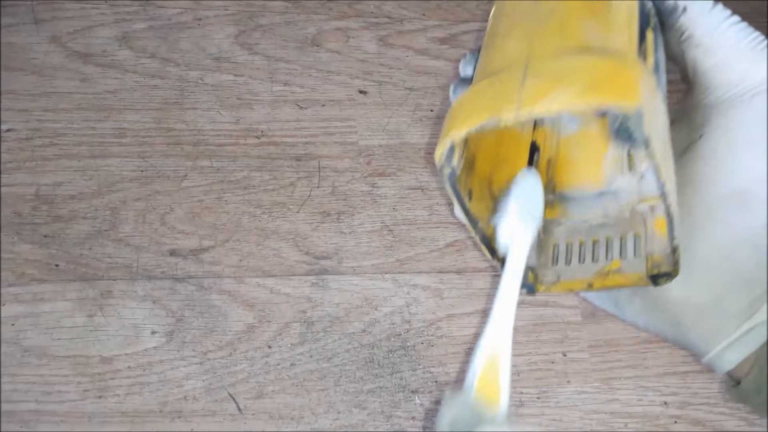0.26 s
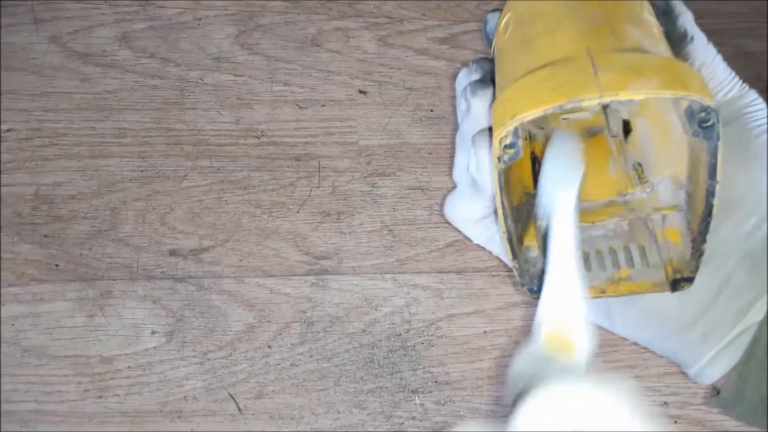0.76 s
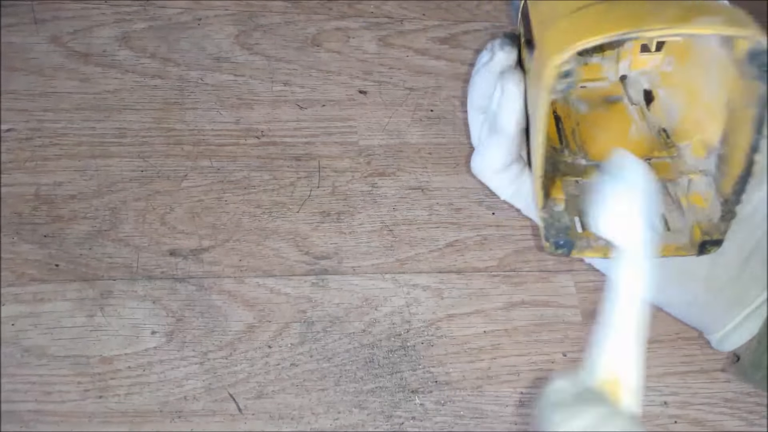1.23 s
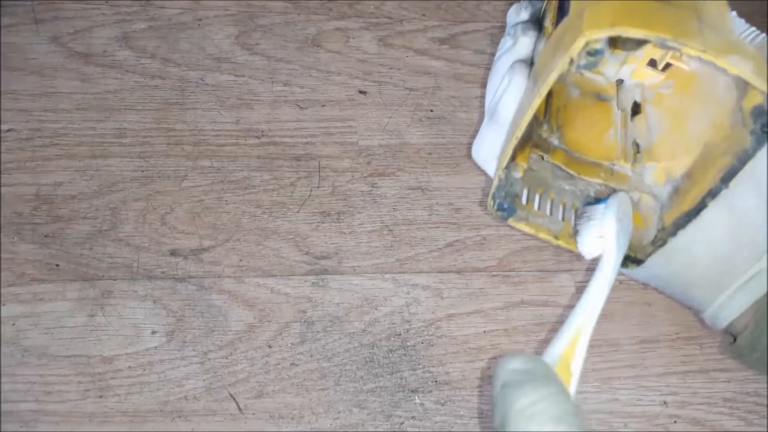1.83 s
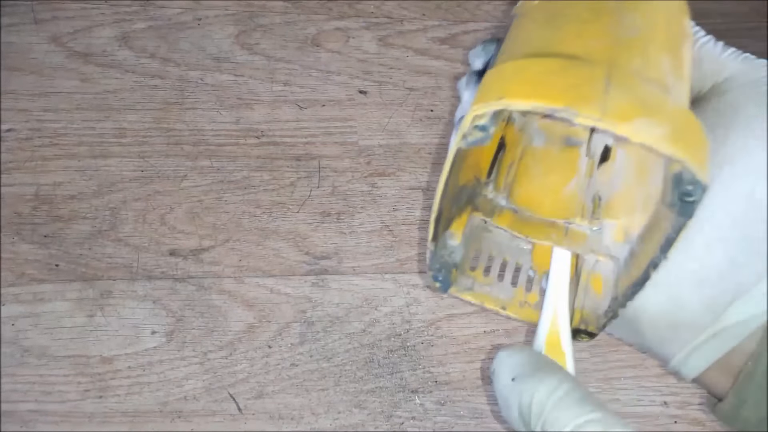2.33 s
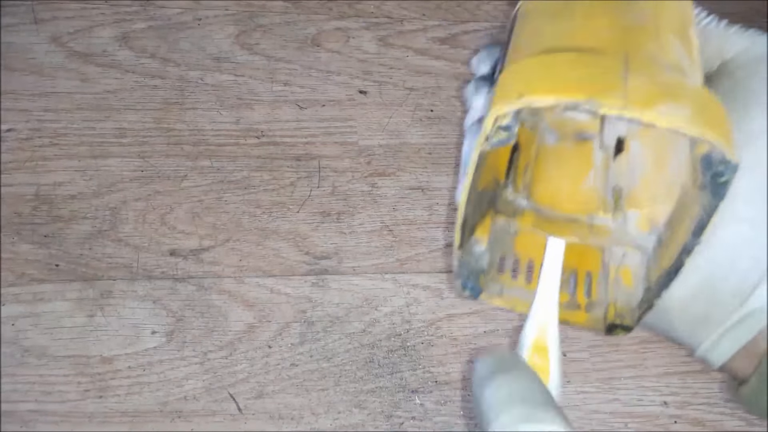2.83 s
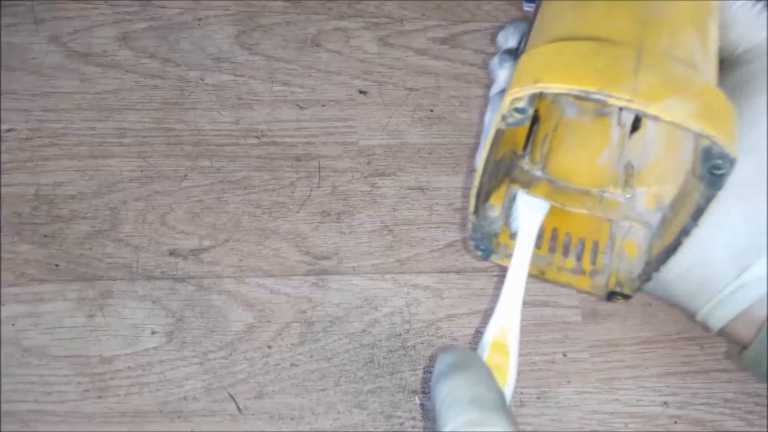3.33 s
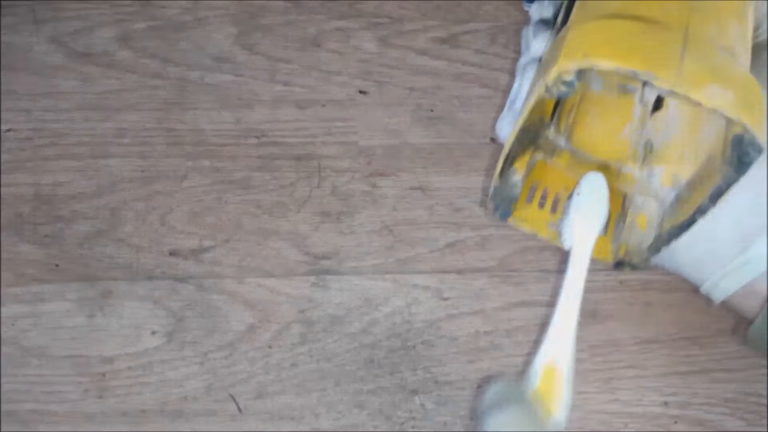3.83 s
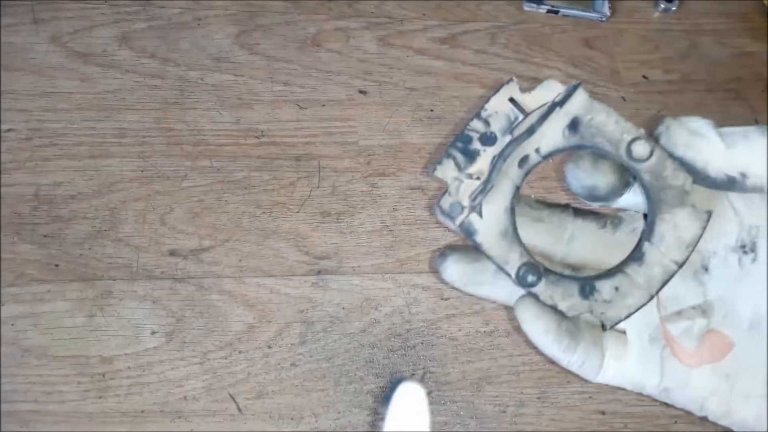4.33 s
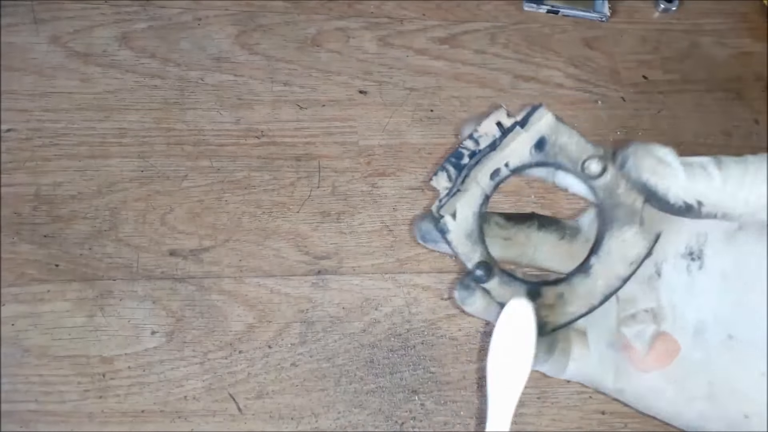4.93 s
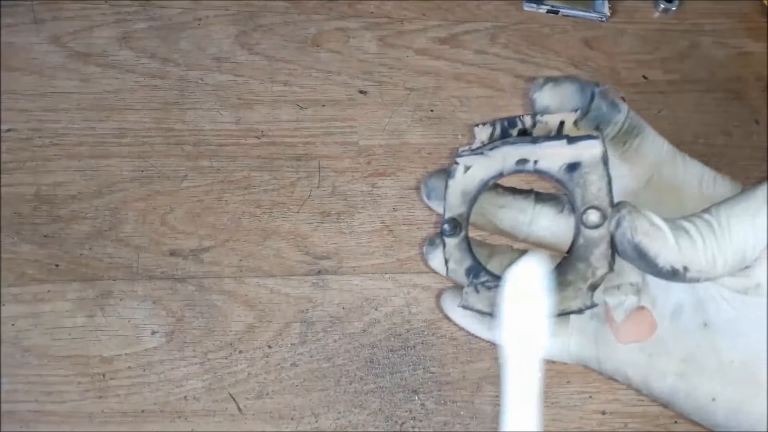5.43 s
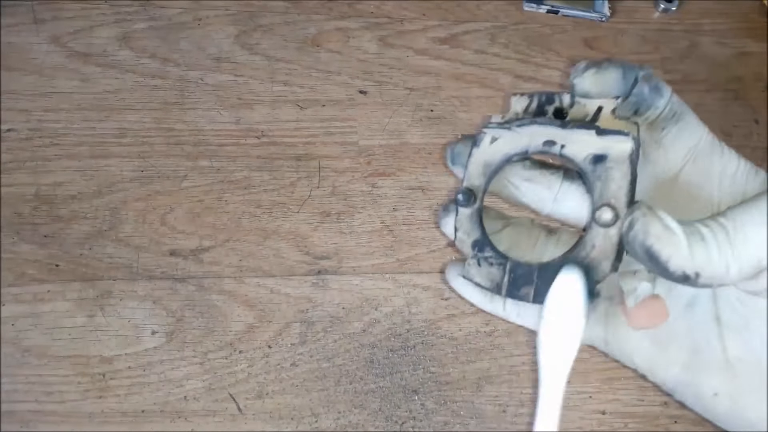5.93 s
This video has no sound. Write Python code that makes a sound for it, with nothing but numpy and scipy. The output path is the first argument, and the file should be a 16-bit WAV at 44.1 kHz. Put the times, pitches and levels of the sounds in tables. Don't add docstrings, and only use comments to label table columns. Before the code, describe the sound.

Close, dry toothbrush scrubbing in a hollow plastic housing: quick uneven rasping strokes, with hard brush-head knocks and dull thuds. Strokes become denser over a slotted floor, stop for a short pause with barely audible glove rustle, then return as light, even, hissy strokes on a small solid ring. Small dry workshop, close phone microphone, faint fan, hiss and distant traffic; a motor passes outside early on.

```python
import sys
import numpy as np
from scipy import signal
from scipy.fft import rfft, irfft
from scipy.io import wavfile
from scipy.ndimage import uniform_filter1d

SR = 44100
rng = np.random.default_rng(int(sys.argv[2]) if len(sys.argv) > 2 else 0)


def voltage_ratio(decibels):
    exponent = np.asarray(decibels, float) / 20
    return 10 ** exponent


def master_out(mix):
    frames = np.transpose(np.atleast_2d(mix))
    ceiling = np.clip(frames, -1, 1)
    pcm = np.round(ceiling * 32767).astype(np.int16)
    wavfile.write(sys.argv[1], SR, pcm)


N = 272538
TIME = np.arange(N) / SR

TURN_S, CORNER_S, SWAP_S, RING_S = 1.9, 3.71, 4.33, 5.15

# (start [s], length [s], start level [dB], end level [dB])
MOUTH_STROKES = [(0, 0.017, -45.5, -43.5), (0.046, 0.045, -46.5, -41), (0.118, 0.03, -49, -47),
                 (0.167, 0.078, -45, -43), (0.195, 0.018, -46.5, -35), (0.299, 0.046, -44, -60),
                 (0.349, 0.04, -42.5, -42), (0.451, 0.071, -64, -63.5), (0.576, 0.021, -51.5, -44.5),
                 (0.604, 0.05, -29, -37), (.69, .04, -55, -56), (0.74, 0.071, -45, -35.5),
                 (0.89, 0.075, -45, -36), (1.029, 0.065, -40, -34), (1.167, 0.06, -48, -37.5),
                 (1.246, 0.1, -54, -55), (1.364, .08, -53, -66.5), (1.455, 0.016, -52, -55.5),
                 (1.678, 0.031, -45, -63.5), (1.799, .052, -44.5, -69), (1.835, 0.076, -57.5, -59.5)]
FLOOR_STROKES = [(1.916, 0.13, -42.5, -65.5), (2.069, 0.08, -48, -49), (2.254, 0.045, -49.5, -35.5),
                 (2.313, 0.028, -58, -49.5), (2.355, 0.021, -60, -49.5), (2.494, 0.032, -50.5, -41.5),
                 (2.511, 0.037, -33.5, -30), (2.57, 0.031, -40.5, -37), (2.618, 0.02, -33.5, -36.5),
                 (2.69, 0.052, -66, -57), (2.809, 0.026, -73, -72), (2.847, 0.025, -59, -50.5),
                 (2.926, 0.036, -38.5, -34), (2.994, 0.033, -33.5, -38), (3.061, 0.032, -39.5, -44.5),
                 (3.157, 0.059, -41, -43.5), (3.248, 0.0056, -43, -34.5), (3.281, 0.022, -55.5, -47.5),
                 (3.433, 0.046, -38.5, -38.5), (3.5, 0.065, -54.5, -53.5), (3.57, 0.044, -59, -49.5),
                 (3.635, 0.06, -46.5, -46.5), (3.733, 0.017, -41, -46), (3.767, 0.062, -42, -37.5),
                 (3.9, .006, -42, -45), (3.923, 0.025, -27, -31.5), (3.953, 0.019, -35.5, -35.5),
                 (4.032, 0.052, -57, -49), (4.082, 0.027, -38.5, -42.5), (4.192, 0.061, -52, -44.5),
                 (4.27, 0.081, -74, -67)]
RUSTLES = [(4.368, 0.098, -66.5, -70.5), (4.59, 0.08, -63.5, -76), (4.701, 0.18, -77, -67),
           (4.885, 0.12, -68.5, -69.5), (5.03, 0.11, -66.5, -75.5)]
RING_STROKES = [(5.175, 0.051, -50, -51.5), (5.326, 0.024, -50, -47.5), (5.368, 0.03, -60, -56),
                (5.452, 0.044, -52.5, -50), (5.601, 0.046, -53, -44.5), (5.737, 0.057, -58.5, -48.5),
                (5.884, 0.055, -57, -49.5), (6.026, 0.047, -53.5, -50), (6.162, 0.028, -64, -46.5)]
# (tips [dB], ribs [dB], cavity [dB], shell [dB])
PLACES = [
    (4, -2.5, -5, -11.5),
    (3.5, 2.5, -6.5, -10),
    (1, 2, -6, -9.5),
    (6.5, -1.5, -3.5, -6),
    (10.5, 1, -17, -16),
]
# (time [s], bearing on ribs [dB], depth in hollow [dB], lean on wall [dB], tips splayed [dB])
HEAD_PATH = [(.07, 3, 1, 0.5, 0.5), (.22, 2, 2.5, 5.5, 1.5), (.38, 4, 3, 4.5, 1.5),
             (.63, 3.5, -5, -1.5, -1.5), (.8, -3.5, 2, -4.5, -2), (.95, -2, 2, -4.5, -2.5),
             (1.07, -1.5, 1, -4, -1.5), (1.21, -6, -5.5, -1.5, -1.5), (1.33, 4.5, -2.5, -10, -9),
             (1.47, 9, 5, -4, 3.5), (1.72, 2.5, 7, 9, -1), (1.82, 4, 4.5, 8, -1), (1.95, -3, -1, 1, -2),
             (2.11, 3, 8.5, 6.5, -1.5), (2.29, 3.5, 5, 5.5, -1.5), (2.53, -.5, -1.5, -5, -1),
             (2.63, -0.5, -6.5, 0, -0.5), (2.73, -4.5, -10, -7, -6), (2.86, 2, -3, 8, -1),
             (2.95, 1, -5, -6, -2.5), (3.02, -3, -7, -5.5, -3), (3.08, 2, 1.5, 2, 0.5),
             (3.19, -4, -6, -1.5, -2), (3.26, 2, -0.5, 8, 1), (3.46, -4.5, .5, 1, -1.5),
             (3.56, 0, -10, -1, -6), (3.67, -1, -7, 1, -4.5), (3.8, 2.5, 0, 5.5, 2.5), (3.94, 5, 4.5, 0, 1),
             (4.09, -0.5, -1, -3.5, -3), (4.22, -3, -7, -1.5, 2.5), (4.85, -6, -8, -5, -1.5),
             (4.98, 4, -2, -4.5, -2), (5.2, -8, -9, -4.5, 0.5), (5.34, -4, -3, -4.5, 2),
             (5.48, -3.5, -8, -7, 3), (5.63, -4, -4, -4.5, 1.5), (5.78, -5, -7, -4.5, 1),
             (5.92, -8, -3.5, -3.5, -1), (6.06, 0, -8, -7, -2.5)]

# (frequency [Hz], width [Hz], level [dB])
TIP_MODES = [(10970, 470, -3), (11750, 630, -2.5), (12545, 1300, 2), (13460, 2000, 2), (15860, 1600, -3.5)]
RING_TIP_MODES = [(10120, 1800, -15.5), (11660, 1380, -6), (13190, 1100, 0.5), (14040, 1300, 2.5),
                  (15460, 1000, -5)]
WALL_MODES = [(8090, 560, 0), (8840, 970, 0.007), (10305, 1100, 0.0098)]
RIB_MODES = [(4405, 410, -1.7), (5070, 290, -0.71), (5610, 360, 0.97), (6390, 430, -1.015),
             (7560, 320, 1.9)]
MOUTH_RIB_MODES = [(4920, 710, -5.5), (6520, 390, -1.5), (7520, 400, -1.5)]
CAVITY_MODES = [(3268, 90, -1.5), (3551, 90, -0.5), (3920, 230, -6)]
SHELL_MODES = [(1632, 140, -7), (2035, 87, 2.5), (2258, 110, 2.5), (2760, 470, -4)]
GRIP_MODES = [(790, 1400, -1.6), (1488, 590, -1.4)]
RING_RIB_MODES = [(4610, 1300, -6), (5630, 600, 0.5), (7400, 910, 0)]
RING_LOW_MODES = [(3280, 1200, 3.5), (4210, 300, 7.2)]

# (time [s], crack energy [dB], body against crack [dB], contact [ms])
LIP_KNOCKS = [(0.4896, -26, -13, 3.5), (0.5637, -21.5, -6, 3.7), (0.606, -8, -12, 1.7),
              (.6313, 9.5, -6, 1.4), (0.874, -20, -21, 1.1), (1.0707, -8, -1, 3.6), (1.1601, -19, -14, 2),
              (1.1787, -14, -14, 1.4), (1.268, -25, -9, 4.4), (1.323, -18.5, -5.5, 0.75),
              (1.8255, -13, -7, 1), (1.837, -28, -2, 1.1), (1.9845, -23, -5, 0.94), (2.706, -31, -8, 1.8),
              (2.718, -34, -12, 1.5), (2.74, -33, -12, 3), (2.754, -34, -15, 2), (2.8085, -38, -9, 1.5),
              (4.066, -24, -5, 2), (2.5429, -1.5, -4, 5.1), (4.0859, -30, 13.5, 1.5), (4.082, -7, 6, 0.82)]
RIB_KNOCKS = [(2.172, -22.5, 0, 3.2), (3.0356, -6, 5.5, 1.4), (3.0415, -32, 2, 1.7), (2.5134, -14, -4, 2),
              (2.617, -10, -4, 1.5), (2.848, -39, 11, 4), (3.066, -19, 1, 2), (3.6473, -21, -11, 2),
              (3.773, -19, 1, 2), (4.953, -49, 8, 6), (3.192, -16.5, 4.5, 1.3), (3.4746, -8, -3, 2.9),
              (3.7301, -1.5, -5.5, 1.7), (3.9221, 8.5, 0.5, 1.3), (3.971, -21, 13, 2),
              (4.0326, -19, -2, 1.4), (4.0383, -17.5, 4.5, 4), (4.1875, -19.5, -5.5, 1.4),
              (4.19, -19, -8, 3.4), (4.3147, -23, -12, 1.3), (4.848, -32, -19, 1.1),
              (4.8814, -26.5, -10, 1.1)]
RIM_KNOCKS = [(0.3, -29, -2, 3.1), (1.301, -28, -5, .92), (1.5496, -27, -3, 1.7), (1.6916, -21.5, -5, 4.6),
              (1.728, -23, -3, 13), (1.8036, -23.5, 13.5, 9), (4.052, -22, 1, 1.4), (4.202, -18, -9, 1.7)]
EDGE_KNOCKS = [(0.4506, -21.5, -7.5, 25), (.7497, -10.5, -27, 1.1), (0.897, -22, -4, 3.5),
               (1.0248, 6.5, 0, 0.65), (1.4609, -24.5, -7.5, 1)]
WALL_KNOCKS = [(2.643, -15.5, 0, 1), (4.111, -18, -4.5, 2), (2.8507, -39.5, 11, 1.3),
               (2.8556, -15, -1, 1.1), (3.225, -25, 2, 1.2), (3.253, -18, -3, 5.5), (3.4395, -23, -10, 2),
               (3.4448, -10, -1.5, 2.1), (3.451, -13, 0, 2.2), (3.4811, -15.5, -4.5, 1),
               (3.7334, -43, -25, 2.6), (3.896, -1.5, -3.5, 1.5), (3.8982, -24, -11, 3.8)]
# (time [s], crack energy [dB])
RING_TICKS = [(4.967, -31.5), (5.043, -42.5), (5.1783, -15.5), (5.247, -35.5), (5.8571, -36.5),
              (5.873, -34), (5.8826, -31.5), (5.9015, -33), (5.3153, -36), (5.3932, -33), (5.5762, -41),
              (5.593, -36), (5.475, -28), (6.049, -29), (6.062, -27.5), (6, -34), (5.3275, -29.5),
              (5.352, -33), (5.456, -22.5), (5.4636, -20.5), (5.736, -29), (6.0292, -33), (6.0399, -23.5),
              (6.151, -29), (6.1704, -22.5), (6.1784, -35)]
# (ribs [dB], cavity [dB], shell [dB])
STRUCK = [
    (0, -10.5, -15.5),
    (-0.5, -7.5, -14),
    (-9, 1, -10),
    (1, -4, -24.5),
    (-1.5, -3, -2),
    (2, -18, -5.5),
]

# (time [s], peak level [dB], pitch [Hz], decay by 60 dB [s])
THUDS = [(0.629, -28.5, 492, 0.038), (1.063, -45, 727, 0.049), (1.8, -50.5, 641, 0.11),
         (2.856, -40, 646, 0.035), (3.034, -44, 1190, 0.04), (3.448, -58, 1130, 0.074),
         (3.919, -34.5, 463, 0.046), (4.037, -41.5, 497, 0.029)]
# (start [s], length [s], from [Hz], to [Hz], level [dB])
SCRAPE = (1.2, 0.03, 2350, 3200, -62)
# (time [s], peak level [dB], length [s])
SHIFTS = [(2.235, -53.5, 0.028), (2.398, -56.5, 0.024), (4.755, -63, 0.094), (6.069, -61.5, 0.083)]
# (time [s], pitch [Hz], level [dB], half-order level [dB])
MOTOR = [(0, 264.7, -73, -79.5), (.2, 265.2, -64, -73), (.42, 266, -56, -68), (.9, 265, -56, -67.5),
         (1.051, 267.4, -65.5, -75), (1.499, 269.4, -69.5, -79)]
# (frequency [Hz], density [dB per Hz])
SHOP_SPECTRUM = [(25, -29.5), (64, -27.5), (95, -13), (200, -5), (270, -5.5), (400, -15.5), (680, -13.5),
                 (900, -16.5),
                 (1120, -16), (1400, -22), (2200, -23), (3000, -35), (5000, -37.5), (14400, -26),
                (16000, -44.5)]


def bristles():
    tips, ribs, cavity, shell = voltage_ratio(spot(TIME))
    stream = slips(per_s=14000, spread_db=1.2, tuft_db=0.75)
    drive = stream * voltage_ratio(pressure_db()) / np.sqrt(1 + tips ** 2 + ribs ** 2)
    mouth, housing = TIME < TURN_S, TIME < SWAP_S
    parts = [
        (tips * housing, TIP_MODES),
        (tips * ~housing, RING_TIP_MODES),
        (shell * voltage_ratio(-14), GRIP_MODES),
        (1, WALL_MODES),
        (ribs * housing * ~mouth, RIB_MODES),
        (ribs * mouth, MOUTH_RIB_MODES),
        (cavity * housing, CAVITY_MODES),
        (shell * housing, SHELL_MODES),
        (ribs * ~housing, RING_RIB_MODES),
        (cavity * ~housing, RING_LOW_MODES),
    ]
    sound = 0
    for gain, modes in parts:
        push_or_pull = np.sign(rng.standard_normal(N))
        sound = sound + resonate(drive * gain * push_or_pull, modes, waver_db=2.5)
    return sound


def slips(per_s, spread_db, tuft_db):
    happens = rng.random(N) < per_s / SR
    size = voltage_ratio(spread_db * rng.exponential(size=N)) * rng.standard_normal(N)
    tufts = voltage_ratio(tuft_db * (walk(220) + walk(60) + walk(30)))
    return level(happens * size * tufts, 0)


def pressure_db(arch_db=3):
    rise_s, fade_s, ring_fade_s = 0.024, 0.14, 0.15
    soft_entry, sharp_lift = 0.89, 0.51
    drag_share, drag_db = 0.14, -9
    lift_s, lift_db = 0.0054, -14
    coarse = TIME[::32]
    out = np.full(len(coarse), -76.0)
    for s, length, start_db, end_db in MOUTH_STROKES + FLOOR_STROKES + RUSTLES + RING_STROKES:
        rise = rise_s * voltage_ratio(soft_entry * (end_db - start_db))
        fade = (ring_fade_s if s > RING_S else fade_s) * voltage_ratio(sharp_lift * (start_db - end_db))
        end = s + length
        dragged = end + drag_share * fade
        times = [s - rise, s, s + length / 2, end, dragged, dragged + lift_s, end + fade + lift_s]
        middle_db = (start_db + end_db) / 2 + arch_db
        levels = [start_db - 60, start_db, middle_db, end_db, end_db + drag_db, end_db + lift_db, end_db - 60]
        out = np.maximum(out, np.interp(coarse, times, levels))
    return np.interp(TIME, coarse, out)


def spot(t):
    s, *controls = np.transpose(HEAD_PATH)
    ribs, depth, lean, tips = (np.interp(t, s, c) for c in controls)
    place = np.transpose(PLACES)[:, np.searchsorted([TURN_S, CORNER_S, SWAP_S, RING_S], t)]
    return place + np.array([tips, ribs, depth, lean])


def knocks():
    ticks = [(s, db, -23.5, 1.4) for s, db in RING_TICKS]
    tables = LIP_KNOCKS, RIB_KNOCKS, RIM_KNOCKS, EDGE_KNOCKS, WALL_KNOCKS, ticks
    rows = []
    for table, colour in zip(tables, STRUCK):
        for s, db, body_db, ms in table:
            rows.append((s, db, ms, *np.add(colour, body_db)))
    s, db, contact_ms, ribs_db, cavity_db, shell_db = np.transpose(rows)[:, :, None]
    t = np.arange(2048) / SR
    contact = np.exp(-t / (0.00028 * contact_ms))
    rattle = 0.18 * np.exp(-t / 0.0045)
    force = (1 - np.exp(-t / 0.0001)) * (contact + rattle)
    blow = force * rng.standard_normal((len(s), 2048))
    tips = voltage_ratio(spot(s)[0] - 1.0)
    parts = [
        (tips / np.hypot(1, tips), TIP_MODES),
        (1 / np.hypot(1, tips), WALL_MODES),
        (voltage_ratio(ribs_db) * (s > TURN_S), RIB_MODES),
        (voltage_ratio(ribs_db) * (s < TURN_S), MOUTH_RIB_MODES),
        (voltage_ratio(cavity_db), CAVITY_MODES),
        (voltage_ratio(shell_db), SHELL_MODES),
        (voltage_ratio(shell_db - 20.5), GRIP_MODES),
    ]
    sound = 0
    for share, modes in parts:
        part = resonate(blow, modes)
        sound = sound + voltage_ratio(db + 0.57) * share * part / np.linalg.norm(part, axis=1, keepdims=True)
    out = np.zeros(N + 2048)
    for start, hit in zip((s[:, 0] * SR).astype(int), sound):
        out[start:start + 2048] += hit
    return out[:N]


def thuds():
    out = np.zeros(N + 4096)
    t = np.arange(4096) / SR
    scuffs = band(rng.standard_normal((len(THUDS), 4096)), 520, 1500)
    for (s, db, hz, t60), scuff in zip(THUDS, scuffs):
        body = np.sin(2 * np.pi * hz * t) + 3.5 * scuff
        envelope = (1 - np.exp(-t / 0.0021)) * np.exp(-np.log(1000) * t / t60)
        start = int(s * SR)
        out[start:start + 4096] += voltage_ratio(db - 4) * body * envelope
    return out[:N]


def scrape():
    s, length, from_hz, to_hz, db = SCRAPE
    along = (TIME - s) / length
    hz = np.interp(along, [0, 1], [from_hz, to_hz]) * (1 + 0.03 * walk(400))
    phase = 2 * np.pi * np.cumsum(hz) / SR
    return voltage_ratio(db + 4 * walk(150)) * np.sin(phase) * np.sin(np.pi * np.clip(along, 0, 1))


def shifts():
    noise = rng.standard_normal(N)
    rub = level(band(noise, 244, 308) + 0.35 * band(noise, 350, 553), 0)
    return rub * sum(voltage_ratio(db) * np.exp(-((TIME - s) / length) ** 2) for s, db, length in SHIFTS)


def room(x, t60=0.12, wet_db=-24):
    t = np.arange(int(0.3 * SR)) / SR
    tail = rng.standard_normal(len(t)) * np.exp(-np.log(1000) * t / t60) * (t > 0.002)
    return x + voltage_ratio(wet_db) * signal.fftconvolve(x, tail / np.linalg.norm(tail))[:N]


def motor():
    s, *columns = np.transpose(MOTOR)
    hz, db, half_db = (np.interp(TIME, s, c) for c in columns)
    phase = 2 * np.pi * np.cumsum(hz) / SR
    fade = np.clip((s[-1] - TIME) / 0.22, 0, 1)
    note = voltage_ratio(db + 1.4 * walk(7.8)) * np.sin(phase)
    half_order = voltage_ratio(half_db + 2.1 * walk(8)) * np.sin(phase / 2)
    upper = voltage_ratio(db - 14 + 3.8 * walk(10)) * np.sin(phase * 485 / hz[0])
    return np.sqrt(2) * fade * (note + half_order + upper)


def shop():
    hz, db = np.transpose(SHOP_SPECTRUM)
    rumble_db = -1.8 + 9 * np.exp(-((TIME - 0.6) / 0.6) ** 2)
    whine_db = 3 * np.clip((TIME - 3.9) / 0.3, 0, 1)
    whirr_db = 1.2 - 4 * np.exp(-((TIME - 1.85) / 0.48) ** 2)
    f = np.fft.rfftfreq(N, 1 / SR)
    noise = rfft(rng.standard_normal(N)) * voltage_ratio(np.interp(np.log(f + 1), np.log(hz), db))
    out = irfft(noise * (f >= 1400), N)
    for lo in 25 * 2 ** np.arange(0, np.log2(1400 / 25), 0.4):
        hi = min(lo * 2 ** 0.4, 1400)
        swell = (rumble_db if lo < 500 else whirr_db) * (lo > 220) + whine_db * (900 < lo < 1200)
        out = out + irfft(noise * (f >= lo) * (f < hi), N) * voltage_ratio(swell + 1.3 * walk(5))
    return level(out, -62)


def resonate(x, modes, waver_db=0):
    def bank(v, gains):
        total = 0
        for k, (hz, width, db) in enumerate(modes):
            b, a = signal.iirpeak(hz, hz / width, SR)
            total = total + (-1) ** k * voltage_ratio(db) * signal.lfilter(b, a, v * gains[k])
        return band(total, 0.68 * modes[0][0], 1.041 * modes[-1][0])

    gains = [voltage_ratio(waver_db * walk(18)) if waver_db else 1 for _ in modes]
    impulse = np.eye(1, 4096)[0]
    return bank(x, gains) / np.linalg.norm(bank(impulse, np.ones(len(modes))))


def walk(rate):
    k = int(SR / rate)
    held = np.repeat(rng.standard_normal(N // k + 1), k)
    return 1.5 * uniform_filter1d(uniform_filter1d(held, k), k)[:N]


def band(x, lo_hz, hi_hz, order=2):
    return signal.sosfilt(signal.butter(order, [lo_hz, hi_hz], "bandpass", fs=SR, output="sos"), x)


def level(x, db):
    return x * voltage_ratio(db) / np.sqrt(np.mean(x ** 2))


def scene():
    brush_work = room(bristles() + knocks() + thuds())
    return (brush_work + shifts() + motor() + shop() + scrape())[None, :]


def band_limit(x):
    return signal.sosfilt(signal.butter(12, 16990, fs=SR, output="sos"), x)


def record(dry):
    cut = signal.sosfilt(signal.ellip(8, 0.5, 48, 15750, fs=SR, output="sos"), dry)
    mix = np.clip(cut, -1, 1)
    return band_limit(mix)


dry = scene()
out = record(dry)
master_out(out)
```